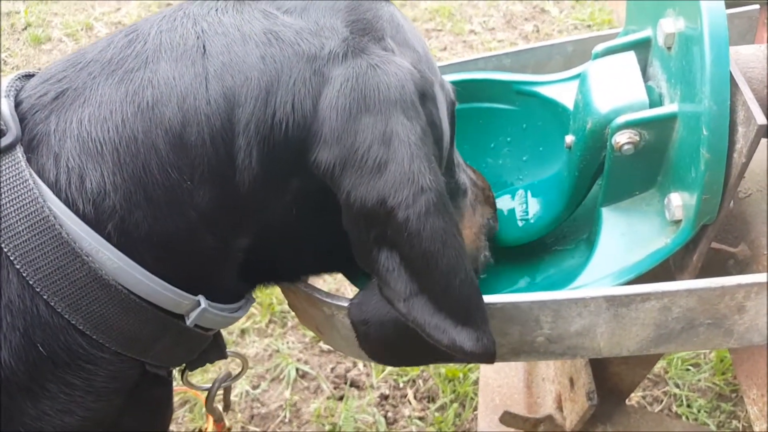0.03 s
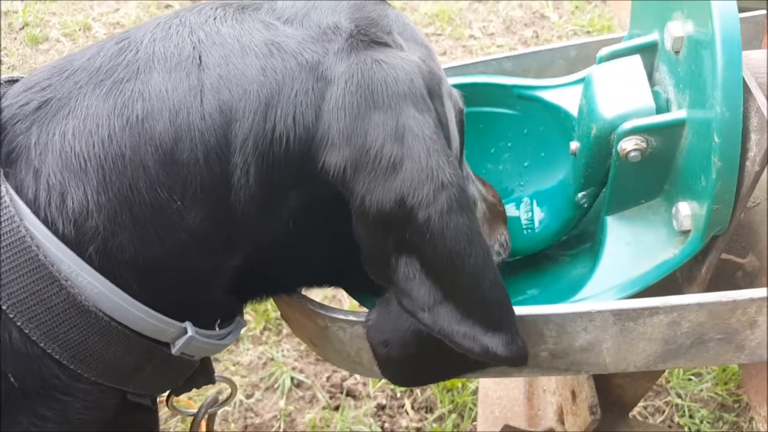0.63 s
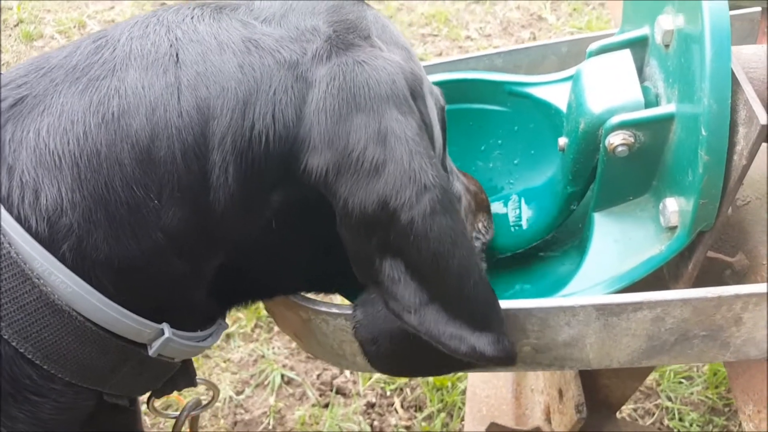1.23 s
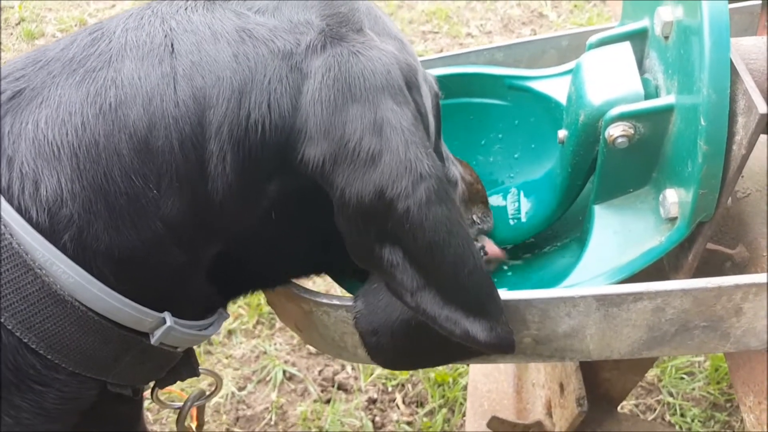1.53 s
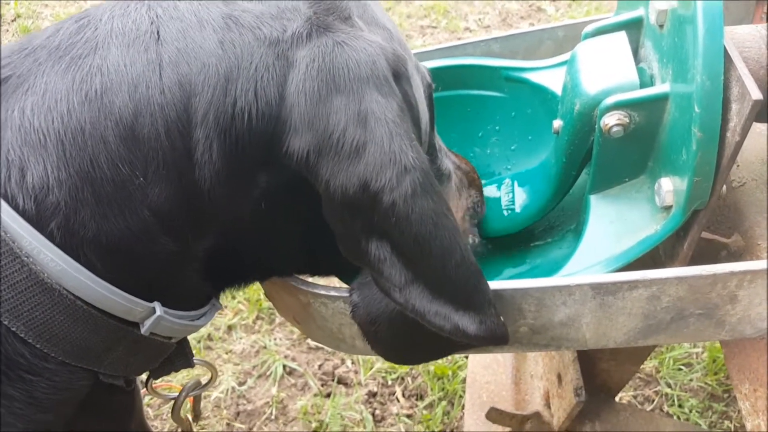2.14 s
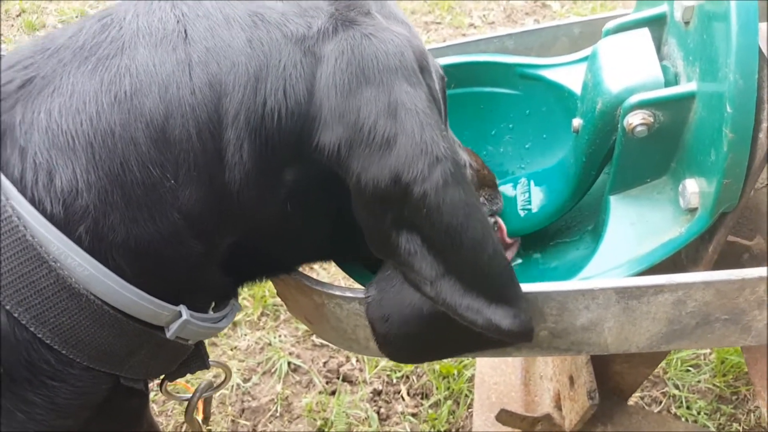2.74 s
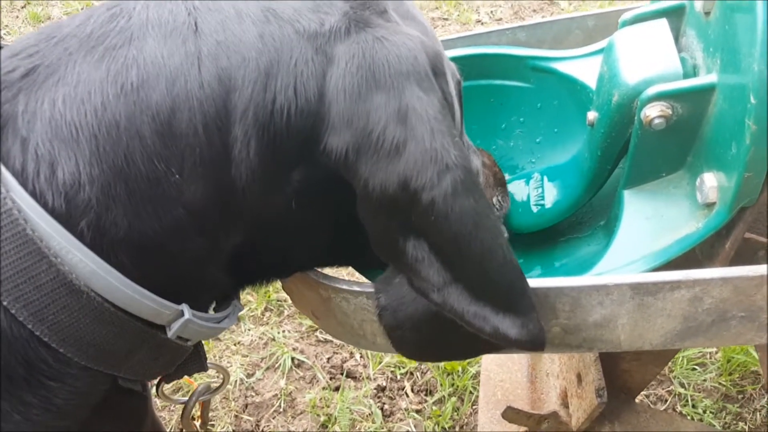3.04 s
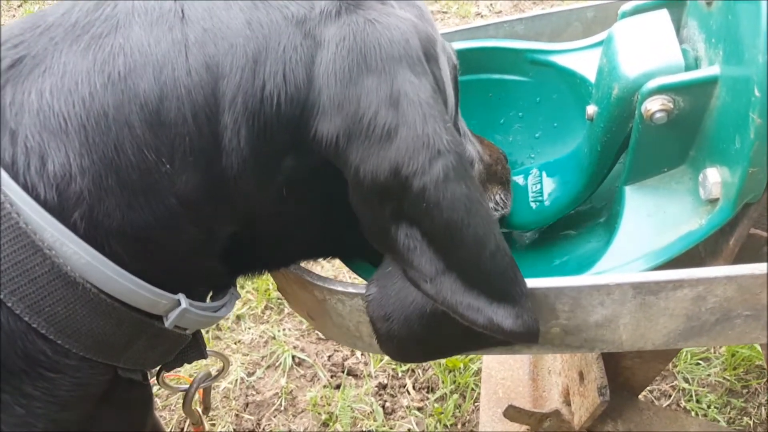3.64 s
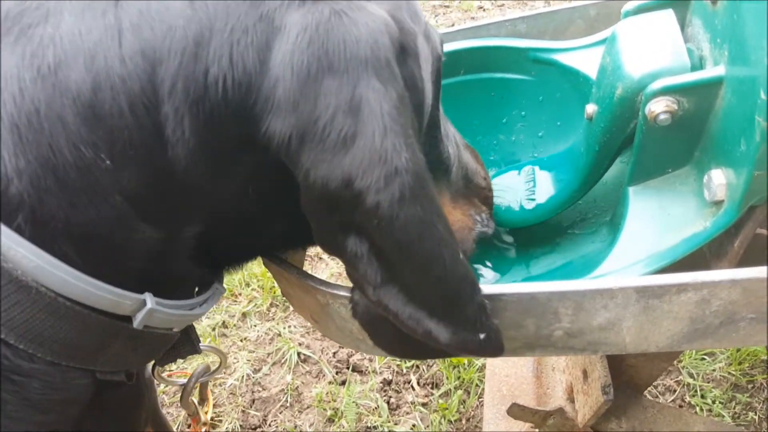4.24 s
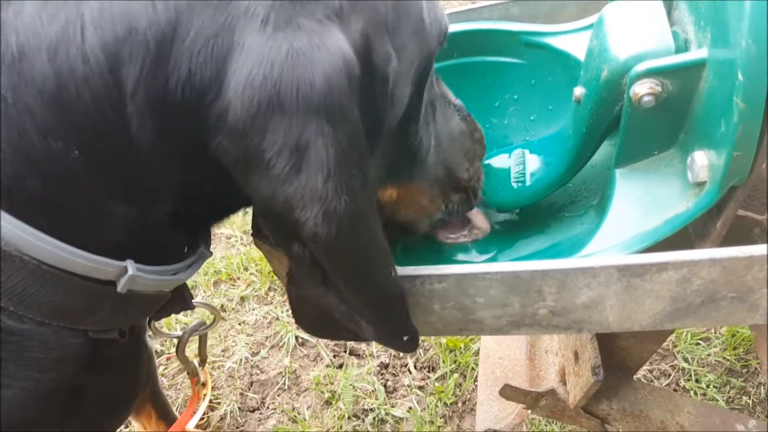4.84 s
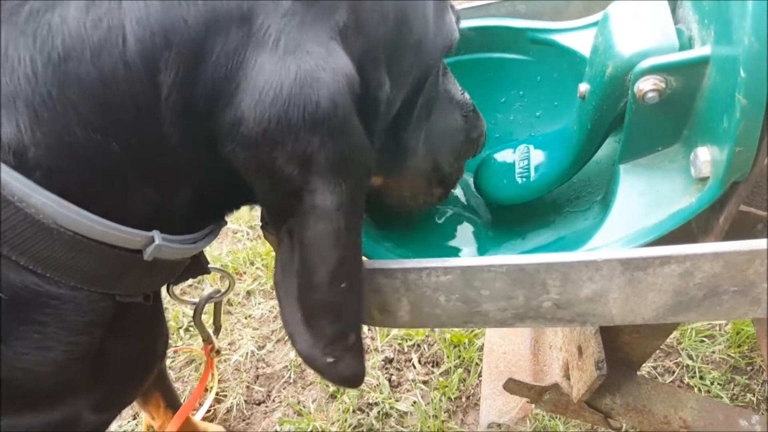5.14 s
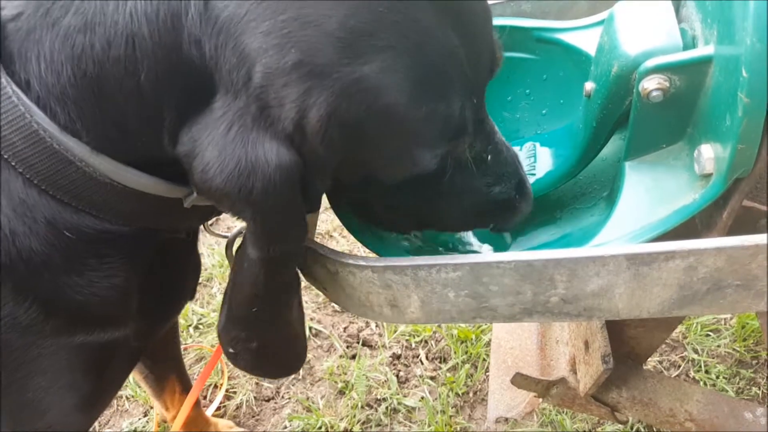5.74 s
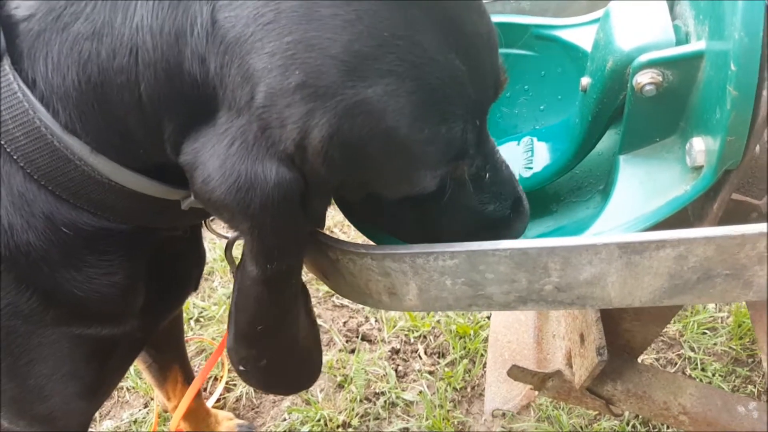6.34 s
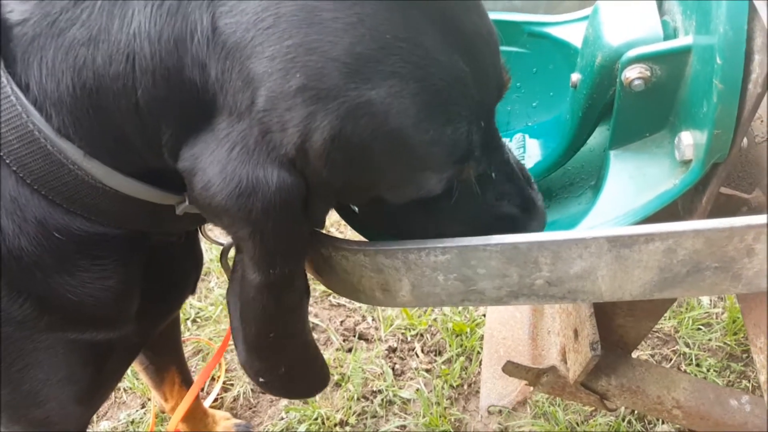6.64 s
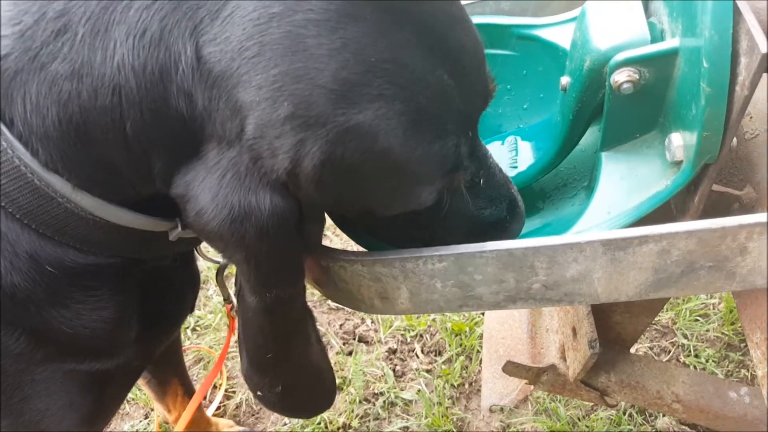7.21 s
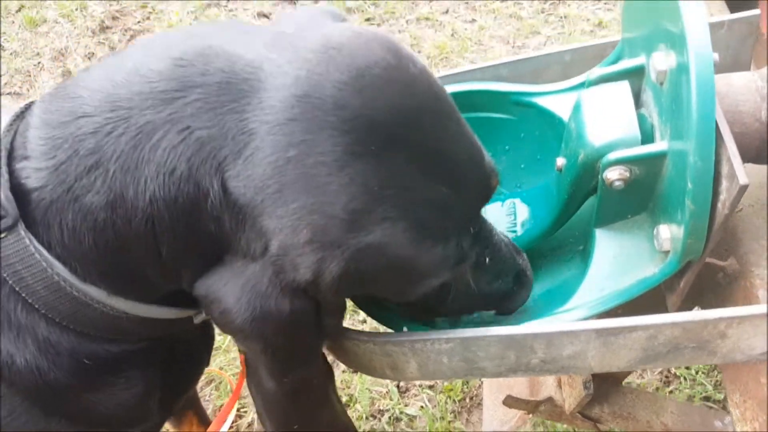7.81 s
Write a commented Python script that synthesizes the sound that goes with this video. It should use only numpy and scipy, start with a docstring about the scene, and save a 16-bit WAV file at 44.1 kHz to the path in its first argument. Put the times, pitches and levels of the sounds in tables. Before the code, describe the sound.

A dog laps water from a plastic livestock bowl, close up, for about eight seconds. From the start, the tongue plunges roughly twice a second, each lap a wet slurp with fine spray, followed by water dribbling back. Small bubble pops, lower glugs and sharp lip smacks scatter throughout, with a short hollow ring from the bowl. A brighter plop and smack stand out near 1.8 seconds. Between 2 and 4 seconds the laps are sparser, and a low gust of wind brushes the microphone around 3 to 3.5 seconds. From about 4.4 seconds the drinking becomes busier and splashier, with crisp smacks near 5 and 5.4 seconds and a strong plop near 5.9, continuing to the end. A weaker gust passes at 7 seconds. Faint thin muzzle hisses come around the first second, near 3.4 and near 7.3, over the quiet, distant rumble of an open field.

```python
"""Outdoors in a quiet field, a dog laps water from a plastic livestock drinking bowl, close up.
About twice a second the tongue plunges with a slurp and a fizz of spray, then water spills back
from the jaws. Trapped air plops (a small bubble pops, a large one glugs), lips and tongue snap,
and the hollow of the bowl rings with all of it. Underneath sit thin hisses from the wet muzzle,
the bed of the field and a little wind on the microphone."""
import sys
import numpy as np
from scipy import signal
from scipy.fft import rfft, irfft, next_fast_len
from scipy.io import wavfile
from scipy.ndimage import uniform_filter1d

SR = 44100
rng = np.random.default_rng(int(sys.argv[2]) if len(sys.argv) > 2 else 0)


def unload_wav(signal):
    """Save mono or channel-first audio to the path in sys.argv[1] as 16-bit WAV at rate SR, clipped to [-1, 1]."""
    wavfile.write(
        sys.argv[1],
        SR,
        np.round(np.clip(np.atleast_2d(signal).T, -1, 1) * 32767).astype(np.int16),
    )


N = 351477

# Cue levels are relative: each layer's trim and colour come on top.
# laps of the tongue: (plunge time [s], hold [s], gurgle [dB], slurp [dB], spray [dB],
# spill delay [s], spill hold [s], spill level [dB])
TONGUE_LAPS = [(0.062, 0.041, -46.5, -53, -67, .15, .04, -54),
               (0.465, 0.076, -59, -46.5, -53, 0.089, 0.033, -56.5),
               (1.097, 0.088, -55, -47.5, -52.5, 0.18, 0.052, -58.5),
               (1.6, 0.026, -47, -45.5, -53, .17, 0.027, -50.5),
               (2.045, 0.045, -50.5, -44, -54, 0.15, 0.028, -56.5),
               (2.836, 0.068, -50.5, -44, -57.5, 0.25, 0.018, -87),
               (3.31, .21, -54, -53.5, -60.5, .53, .04, -73.5),
               (3.987, 0.038, -70, -51.5, -58, 0.17, 0.15, -58.5),
               (4.426, 0.096, -48.5, -54, -57, 0.13, 0.018, -48.5),
               (4.795, 0.048, -46.5, -42.5, -57.5, 0.24, 0.071, -49.5),
               (4.958, 0.048, -47.5, -50, -52, .24, 0.035, -44.5),
               (5.363, 0.062, -61, -45, -51, 0.14, 0.038, -48.5),
               (5.77, 0.083, -51, -50, -52.5, 0.24, 0.031, -47),
               (6.158, .11, -54, -43, -55, 0.23, 0.067, -50),
               (6.566, 0.091, -52.5, -45.5, -51.5, .315, 0.057, -49),
               (7.038, 0.14, -50.5, -45, -55.5, 0.21, 0.048, -53.5),
               (7.448, 0.086, -53, -47.5, -54.5, 0.19, 0.049, -52.5),
               (7.719, 0.012, -75, -45, -49.5, 0.11, .03, -73),
               (7.858, 0.068, -57.5, -51, -55.5, 0.071, .04, -50)]
# water left rocking and dribbling between laps: (time [s], level [dB])
DRIBBLE_LEVEL = [(0.0, -54), (0.16, -73), (0.6, -55), (0.88, -71), (1.0, -54.5), (1.41, -68), (1.5, -56.5),
                 (1.95, -62), (2.2, -68), (2.4, -74.5), (2.58, -71), (2.7, -58.5), (3.0, -63.5),
                 (3.6, -60.5), (4.3, -62), (5.7, -58), (7.0, -57), (7.95, -70)]
# plops of trapped air: (time [s], pop level [dB], pop pitch [Hz], glug level [dB], glug pitch [Hz])
AIR_PLOPS = [(0.063, -38, 2320, -49, 585), (0.095, -35, 2440, -34.5, 1224), (0.102, -47, 1510, -33, 473),
             (0.221, -43.5, 1070, -37.5, 607), (0.326, -34.5, 1350, -44.5, 504),
             (0.464, -37, 1430, -41.5, 866), (0.511, -29.5, 1800, -37.5, 505),
             (0.554, -31.5, 1120, -36, 564), (0.66, -27, 2220, -33.5, 1106), (0.924, -52, 1820, -45, 540),
             (0.951, -38, 2140, -49.5, 510), (1.029, -40, 1840, -45.5, 584), (1.095, -37.5, 900, -41, 457),
             (1.133, -24.5, 3300, -24, 1745), (1.16, -39, 2600, -50, 560), (1.226, -44, 1570, -41, 527),
             (1.306, -41.5, 2110, -43.5, 513), (1.624, -35, 1760, -41, 520), (1.657, -28, 1037, -41, 524),
             (1.763, -31.5, 507, -35.5, 259), (1.769, -18.5, 1890, -36.5, 496),
             (1.867, -35.5, 2600, -46, 540), (2.031, -34.5, 2840, -49, 390), (2.116, -35.5, 2050, -55, 490),
             (2.227, -39, 2470, -29, 1857), (2.267, -67, 1470, -39, 544), (2.627, -30, 1140, -49.5, 590),
             (2.783, -55, 1180, -44, 350), (2.849, -33.5, 1210, -42.5, 510), (2.883, -31.5, 1190, -50, 520),
             (3.064, -73, 990, -41.5, 513), (3.301, -44, 1180, -35.5, 511), (3.381, -27.5, 2480, -22, 940),
             (3.4, -41, 1540, -29, 515), (3.433, -56, 1000, -37.5, 514), (4.151, -37, 1220, -41, 540),
             (4.333, -46.5, 1690, -41, 438), (4.372, -57, 1260, -36.5, 377), (4.437, -57, 1410, -44, 414),
             (4.473, -47, 1730, -38, 480), (4.5, -31.5, 2140, -53, 433), (4.562, -34, 1430, -35, 425),
             (4.599, -25.5, 1500, -35, 390), (4.716, -42, 865, -48, 510), (4.765, -27, 1685, -54, 500),
             (4.794, -29, 1240, -60, 497), (4.857, -29, 1700, -40, 480), (4.871, -52, 1400, -34.5, 487),
             (4.906, -31.5, 2690, -67, 487), (4.933, -34, 1310, -54, 460), (4.966, -22, 3590, -33, 497),
             (5.016, -35, 1110, -32.5, 515), (5.058, -33.5, 1005, -36.5, 490),
             (5.069, -32, 580, -33.5, 247), (5.114, -34.5, 3660, -37.5, 540),
             (5.139, -39, 1510, -40.5, 516), (5.235, -39, 1880, -56, 580), (5.362, -32.5, 860, -29, 458),
             (5.374, -31, 1830, -29.5, 515), (5.403, -32, 2240, -62, 507), (5.435, -53, 1500, -28.5, 526),
             (5.528, -37, 950, -32, 476), (5.549, -37, 1770, -37.5, 490), (5.564, -33.5, 1730, -46, 506),
             (5.627, -31, 1020, -45, 486), (5.777, -34.5, 1610, -35.5, 520),
             (5.838, -34.5, 1490, -38.5, 660), (5.9223, -16, 1893, -36, 516), (5.993, -56, 1730, -44, 563),
             (6.026, -32.5, 1020, -50, 530), (6.095, -43, 850, -53, 515), (6.154, -31.5, 856, -30, 517),
             (6.218, -29, 1580, -60, 506), (6.258, -39, 1350, -38.5, 592), (6.32, -37, 1220, -43, 540),
             (6.378, -27.5, 1530, -59, 500), (6.435, -37.5, 2550, -60, 604), (6.464, -57, 1320, -39, 406),
             (6.481, -37.5, 1350, -36.5, 466), (6.525, -37, 2330, -54, 500), (6.6, -29.5, 2100, -42, 510),
             (6.619, -30.5, 1160, -43, 625), (6.72, -44, 1280, -33, 366), (6.879, -27.5, 1120, -50, 550),
             (6.896, -30, 1487, -34, 980), (6.911, -26.5, 1600, -41, 527), (6.955, -28.5, 1780, -39, 1010),
             (7.068, -39, 2650, -38, 434), (7.086, -27, 1970, -48, 480), (7.114, -24.5, 1510, -34, 967),
             (7.249, -29.5, 1500, -70, 535), (7.266, -34, 1750, -58, 490), (7.313, -36, 2250, -66, 520),
             (7.443, -32, 2310, -40, 470), (7.472, -31.5, 2200, -57, 495), (7.499, -34, 3030, -67, 500),
             (7.896, -27, 2310, -52, 450)]
# wet snaps of tongue and lips: (time [s], level [dB], resonance [Hz])
LIP_SNAPS = [(0.327, -49, 4320), (0.4638, -47.5, 3400), (0.5434, -45, 8300), (0.662, -49.5, 10100),
             (1.0958, -47, 3920), (1.6522, -36.5, 8040), (1.771, -28.5, 15400), (1.7783, -40, 9600),
             (2.1922, -51, 4160), (2.2334, -46.5, 9600), (2.945, -44, 7600), (3.2532, -39.5, 7800),
             (3.383, -41, 3500), (3.526, -48, 2760), (4.152, -51.5, 3900), (4.9262, -44, 14000),
             (4.967, -30.5, 8500), (5.0203, -42, 11200), (5.117, -42, 3520), (5.234, -40.5, 14600),
             (5.369, -27, 10200), (5.376, -30, 13400), (5.4078, -34, 10000), (5.5358, -45.5, 9000),
             (5.7796, -35.5, 6000), (5.878, -35.5, 8800), (6.181, -38, 6400), (6.2304, -38.5, 5030),
             (6.4366, -41, 13300), (6.634, -40, 7900), (7.024, -38.5, 3330), (7.077, -32, 4600),
             (7.105, -40, 8200), (7.1538, -42, 3470), (7.25, -47, 3000), (7.317, -40, 5430),
             (7.461, -39.5, 9100), (7.478, -32.5, 8700), (7.509, -42, 13300), (7.7447, -44.5, 8300),
             (7.8138, -43, 13500), (7.8867, -39.5, 9200)]
# EQ of the stirred water: (frequency [Hz], gain [dB])
WATER_EQ = [(100, 22), (250, 0.5), (500, 2.5), (750, -3), (1000, 1), (1450, 2.5), (2000, 3.5), (2900, -1.5),
            (4500, -5.5), (6200, -10.5), (9000, -8.5), (12500, -11), (16000, -11.5)]
# EQ of the snaps: (frequency [Hz], gain [dB])
SNAP_EQ = [(100, 2), (500, 13.5), (2000, 21.5), (3500, 15.5), (6000, 6.5), (9000, 8.5), (16000, 0.5)]
# the bowl throws each bubble pitch to its own side: (pitch [Hz], left over right [dB])
BUBBLE_PAN = [(250, 0), (500, -5), (850, 2.5), (1030, 8.5), (1250, -6.5), (1600, -7), (1900, -3.5),
              (2400, 1), (4500, -1)]
# resonances of the hollow of bowl and muzzle: (frequency [Hz], bandwidth [Hz], gain [dB])
BOWL_MODES = [(557, 44, -32), (990, 270, -12.5), (1980, 1400, -16)]
# air wheezing past the wet muzzle: (start [s], end [s], level [dB], centre [Hz], bandwidth [Hz])
MUZZLE_HISSES = [(0.365, 0.615, -57.5, 9450, 1000), (0.577, 0.804, -62, 1270, 159),
                 (0.685, 1.063, -62, 5950, 706), (0.671, 1.122, -63, 1970, 220),
                 (0.921, 1.342, -57.5, 9330, 650), (3.158, 3.594, -63, 9300, 1300),
                 (3.193, 3.62, -66.5, 13700, 3000), (7.236, 7.455, -62, 5540, 1000)]
# gusts on the microphone: (time [s], level [dB])
WIND_GUSTS = [(2.7, -82), (2.95, -49), (3.05, -45), (3.2, -57.5), (3.35, -35), (3.5, -39.5), (3.6, -62),
              (6.85, -70.5), (7.0, -48), (7.2, -67)]
# EQ of the wind rumble: (frequency [Hz], gain [dB])
WIND_EQ = [(10, -53), (45, 6), (85, 6.5), (140, -2), (400, -18), (1500, -86)]
# EQ of the open field with its distant rumble: (frequency [Hz], gain [dB])
FIELD_EQ = [(20, -20), (45, 4), (75, 3.5), (140, 1.5), (300, -15.5), (600, -36), (1200, -29), (2500, -42),
            (5000, -35.5), (10000, -40.5), (16000, -36)]
# likeness of left and right in diffuse sound: (frequency [Hz], coherence [0-1])
STEREO_COHERENCE = [(40, 0.98), (130, 0.98), (290, 0.92), (640, 0.91), (1400, 0)]


def lapping():
    """The tongue churns up a gurgle of large bubbles, a slurp of small ones and a fine spray."""
    times, gurgle_db, slurp_db, spray_db = lap_envelopes()
    large = swarm(low_hz=371, high_hz=678, cycles=13.4, spread_db=4.5, rise=0.27, count=550, size=1900)
    small = swarm(low_hz=860.6, high_hz=4200, cycles=50, spread_db=7, rise=0.27, count=1700, size=1000)
    fine = swarm(low_hz=3900, high_hz=15800, cycles=42, spread_db=6.5, rise=0.05, count=3500, size=350)
    gurgle = churn(large, fader(times, gurgle_db - 1), 178, 850, calm_db=-60, bubbly=0.69, ragged_db=6.5)
    slurp = churn(small, fader(times, slurp_db - 1), 740, 3700, calm_db=-58, bubbly=0.55, ragged_db=6)
    spray = churn(fine, fader(times, spray_db + 1.5), 3800, 16200, calm_db=-64, bubbly=0.42, ragged_db=6)
    return gurgle + slurp + spray


def lap_envelopes(wake_s=0.002):
    """Times and dB curves for gurgle, slurp and spray: plunges, spills and plop wakes over a dribble."""
    t = np.arange(0, N, 64) / SR
    dribble_db = np.interp(t, *np.transpose(DRIBBLE_LEVEL))
    power = amp([dribble_db, dribble_db, dribble_db - 9.5]) ** 2
    for at, hold, gurgle_db, slurp_db, spray_db, spill_delay, spill_hold, spill_db in TONGUE_LAPS:
        power += splash(t, at, hold, [gurgle_db, slurp_db, spray_db])
        power += splash(t, at + spill_delay, spill_hold, [spill_db - 1, spill_db, spill_db - 14.5])
    for at, pop_db, _, glug_db, _ in AIR_PLOPS:
        power += splash(t, at + wake_s, 0, [glug_db - 17, pop_db - 23, pop_db - 40], attack_s=wake_s)
    return t, *(10 * np.log10(power))


def splash(t, peak_s, hold_s, levels_db, attack_s=0.025, release_db_per_s=305):
    """Power of one splash in each layer: it swells to its peak, holds and dies away."""
    swell = np.clip(1 + (t - peak_s) / attack_s, 0, 1)
    fade = amp(-release_db_per_s * np.maximum(t - peak_s - hold_s, 0))
    return np.outer(amp(levels_db), swell * fade) ** 2


def swarm(low_hz, high_hz, cycles, spread_db, rise, count, size):
    """A texture of bubbles, random in pitch, time and pan, compressed to a fairly even level."""
    onset, pitch, life, pan = rng.random((4, count, 1))
    hz = low_hz * (high_hz / low_hz) ** pitch
    strength = amp(spread_db * np.minimum(rng.exponential(1, (count, 1)), 3))
    tones = strength * bubble_ring(np.arange(size) / SR, hz, cycles * (0.5 + life) / hz, rise)
    samples = ((onset * N).astype(int) + np.arange(size)).ravel()
    phase_shift = np.exp(1j * rng.standard_normal((count, 1)) * np.minimum(hz / 2000, 2))
    sides = tones * (0.5 + pan), tones * phase_shift * (1.5 - pan)
    texture = np.array([np.bincount(samples, side.real.ravel(), N)[:N] for side in sides])
    texture = unit(equalise(texture, WATER_EQ))
    power = uniform_filter1d(uniform_filter1d((texture ** 2).mean(0), size=1300), size=1300)
    return texture / np.sqrt(abs(power) + 0.011)


def churn(grains, gain, low_hz, high_hz, calm_db, bubbly, ragged_db):
    """Gently moved water is a soft band of wash; above the calm level it squelches and bubbles."""
    band = [(low_hz / 2, -40), (low_hz, 0), (high_hz, 0), (high_hz * 2, -40)]
    broken = gain ** 2 / (gain ** 2 + amp(calm_db) ** 2)
    flutter = np.clip(wobble(hz=72, size=N)[0], -2, 2)
    squelch = amp(ragged_db * broken * (flutter - 1.5))
    wash = diffuse_noise(along_hz(WATER_EQ) + along_hz(band)) * squelch
    bubble_share = broken * bubbly
    return gain * (np.sqrt(bubble_share) * grains + np.sqrt(1 - bubble_share) * wash)


def plops(pop_t60=0.013, glug_t60=0.032, typical_db=-25):
    """Trapped air cues two bubbles: a short pop and a longer, lower glug."""
    for at, pop_db, pop_hz, glug_db, glug_hz in AIR_PLOPS:
        ring_scale = amp(0.11 * (typical_db - pop_db))  # a harder pop tears and dies sooner
        yield at, pop_db, pop_hz, pop_t60 * ring_scale, 1.2
        yield at, glug_db, glug_hz, glug_t60, 1.4


def drips(per_lap=4, low_hz=900, high_hz=2400, t60=0.009, spread_db=5.5):
    """Drops fall from the jaws into the bowl after each plunge, each cueing one short bubble."""
    for plunge_s, *_, spill_db in TONGUE_LAPS:
        for late, strength, pitch in rng.random((per_lap, 3)):
            at = plunge_s + 0.1 + 0.25 * late
            db = spill_db + 8 + spread_db * (2 * strength - 1)
            yield at, db, low_hz * (high_hz / low_hz) ** pitch, t60, 1


def bubbles(cues, tick_db=-13, tick_s=0.00078, shade_hz=5500, left_lag_s=0.00005):
    """Each bubble ticks as it is pinched off, then rings, roughened by the torn water."""
    out, t = np.zeros((2, N)), np.arange(3000) / SR
    for at, db, hz, t60, swell_cycles in cues:
        # short waves reach left and right out of step
        phase = rng.standard_normal() * min(hz / 5500, 2) + 2 * np.pi * hz * left_lag_s
        roughness = 1 + 0.31 * wobble(hz=900, size=len(t))
        ring = bubble_ring(t, hz, t60, rise=0.17, swell_cycles=swell_cycles)
        tone = ring * np.exp([[0], [1j * phase]]) * roughness
        tick = amp(tick_db) * np.exp(-t / tick_s) * wobble(hz=3800, size=len(t))
        shade = 1 / np.sqrt(1 + (hz / shade_hz) ** 4)  # the muzzle shades the smallest bubbles
        pan_db = np.interp(hz, *np.transpose(BUBBLE_PAN))
        pan = unit(amp([[pan_db / 2], [-pan_db / 2]]))
        add(out, at, amp(db) * pan * (shade * tone.real + tick))
    return out


def bubble_ring(t, hz, t60, rise, swell_cycles=1):
    """A bubble swells within a cycle or two, dies away, and bends up as it nears the surface."""
    envelope = (1 - np.exp(-(t * hz / swell_cycles) ** 2)) * amp(-60 * t / t60)
    turns = hz * (t + rise * t ** 2 / (2 * t60))
    return envelope / envelope.max(-1, keepdims=True) * np.exp(2j * np.pi * turns)


def snaps(trim_db=6, attack_s=0.0012, crack_s=0.00073, fizz_s=0.0044, fizz_db=-21):
    """A film of water tears: a crack, coloured by the gap that opens, and a short fizz of droplets."""
    out, t = np.zeros((2, N)), np.arange(1500) / SR
    for at, db, hz in LIP_SNAPS:
        attack = 1 - np.exp(-t / attack_s)
        decay = np.exp(-t / crack_s) + amp(fizz_db) * np.exp(-t / fizz_s)
        gap = resonant_noise(hz, width_hz=1800, size=len(t))
        spit = amp(-4) * rng.standard_normal((2, len(t)))
        add(out, at, amp(db + trim_db) * attack * decay * (gap + spit))
    return equalise(out, SNAP_EQ)


def bowl(water, echo_db=-12, echo_t60=0.034):
    """The walls scatter sparse echoes, different left and right, and the hollow rings."""
    t = np.arange(6000) / SR
    echoes = rng.standard_normal((2, len(t))) * (rng.random((2, len(t))) < 0.05)
    echoes *= (t > 0.002) * amp(-60 * t / echo_t60)
    response = amp(echo_db) * echoes / np.linalg.norm(echoes, axis=1, keepdims=True)
    for hz, width_hz, db in BOWL_MODES:
        mode = np.exp(-np.pi * width_hz * t) * np.sin(2 * np.pi * hz * t)
        response += amp(db) * 2 * np.pi * width_hz / SR * mode
    return water + signal.oaconvolve(water, response, axes=1)[:, :N]


def muzzle(flutter_hz=45, flutter_db=3.5):
    """Thin, fluttering hisses of air through the dog's wet lips and nose."""
    out = np.zeros((2, N))
    for start, end, db, hz, width_hz in MUZZLE_HISSES:
        size = round((end - start) * SR)
        swell = np.sin(np.linspace(0, np.pi, size))
        airflow = swell * amp(db + flutter_db * wobble(flutter_hz, size)[0])
        add(out, start, airflow * resonant_noise(hz, width_hz, size))
    return out


def wind(left_db=-8, right_db=2):
    """Gusts buffet each side of the microphone separately, mostly the right."""
    rumble = unit(equalise(rng.standard_normal((2, N)), WIND_EQ))
    return fader(*np.transpose(WIND_GUSTS)) * rumble * amp([[left_db], [right_db]])


def field(level_db=-59):
    """A steady bed: the distant rumble of the still field and a faint, even hiss beneath everything."""
    return amp(level_db) * diffuse_noise(along_hz(FIELD_EQ))


def diffuse_noise(colour_db):
    """Coloured noise, centred in the bass and wide in the treble."""
    real, imaginary = rng.standard_normal((2, 2, len(colour_db)))
    left, independent = real + 1j * imaginary
    coherence = np.clip(along_hz(STEREO_COHERENCE), 0, 1)
    right = coherence * left + np.sqrt(1 - coherence ** 2) * independent
    return unit(irfft(np.array([left, right]) * amp(colour_db))[:, :N])


def resonant_noise(hz, width_hz, size):
    """Stereo noise through one resonance."""
    radius = np.exp(-np.pi * width_hz / SR)
    poles = [1, -2 * radius * np.cos(2 * np.pi * hz / SR), radius ** 2]
    return unit(signal.lfilter([1, 0, -1], poles, rng.standard_normal((2, size))))


def wobble(hz, size):
    """Smooth random motion up to the given rate, one for each channel."""
    lowpass = signal.butter(3, hz, fs=SR, output="sos")
    return unit(signal.sosfilt(lowpass, rng.standard_normal((2, size))))


def equalise(x, curve):
    """Shapes a sound with an EQ curve of (frequency [Hz], gain [dB])."""
    size = next_fast_len(N, True)
    return irfft(rfft(x, size) * amp(along_hz(curve)), size)[..., :N]


def along_hz(curve):
    """Reads a curve on a log-frequency axis at every bin of the spectrum."""
    hz, value = np.transpose(curve)
    bins = np.fft.rfftfreq(next_fast_len(N, True), 1 / SR)
    return np.interp(np.log(bins + 1), np.log(hz + 1), value)


def fader(times, db):
    """A gain for every sample from a curve in dB."""
    return amp(np.interp(np.arange(N) / SR, times, db))


def add(mix, at, sound):
    """Lays a stereo sound into the mix at a time in seconds."""
    part = mix[:, max(round(at * SR), 0):][:, :sound.shape[1]]
    part += sound[:, :part.shape[1]]


def amp(db):
    """Decibels to gain."""
    return 10 ** (np.asarray(db) / 20)


def unit(x):
    """Scales to an rms of one."""
    return x / np.sqrt(np.mean(x ** 2) + 1e-20)


def scene(left_db=0.1, right_db=1.0):
    """The water plays through the bowl, laps and snaps a touch right, over muzzle, wind and field."""
    plops_and_drips = bubbles([*plops(), *drips()])
    mouth = (lapping() + snaps()) * amp([[left_db], [right_db]])
    return bowl(plops_and_drips + mouth) + muzzle() + wind() + field()


def record(dry, cutoff_hz=15900):
    """A steep low-pass takes off the very top of the mix."""
    taps = signal.firwin(401, cutoff_hz, window=("kaiser", 9), fs=SR)
    return signal.oaconvolve(dry, taps[None], "same", axes=1)


dry = scene()
out = record(dry)
unload_wav(out)
```